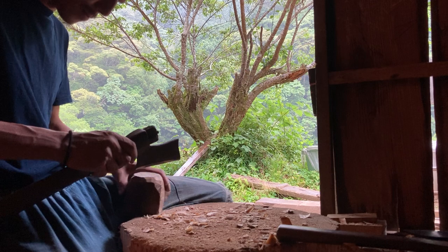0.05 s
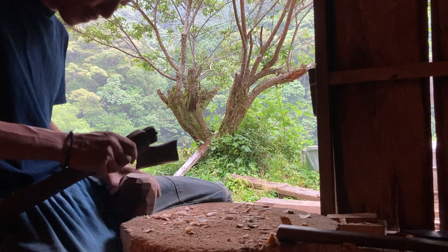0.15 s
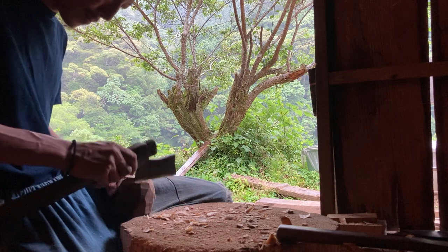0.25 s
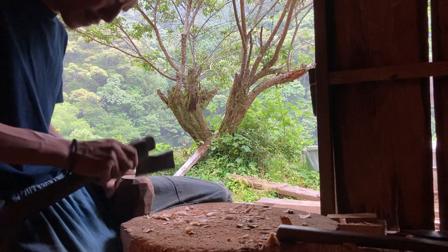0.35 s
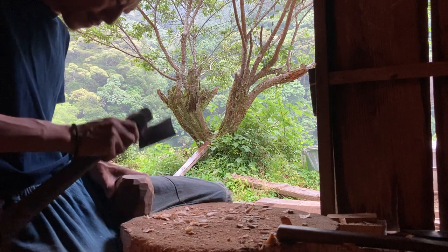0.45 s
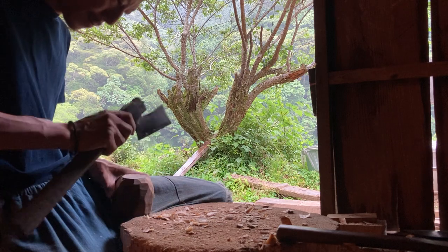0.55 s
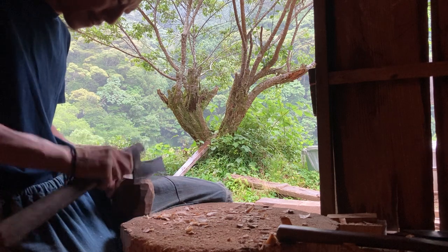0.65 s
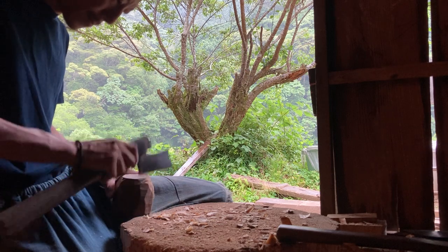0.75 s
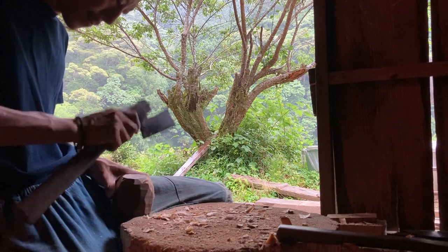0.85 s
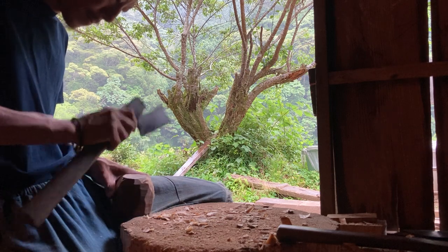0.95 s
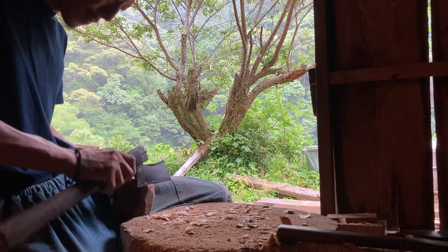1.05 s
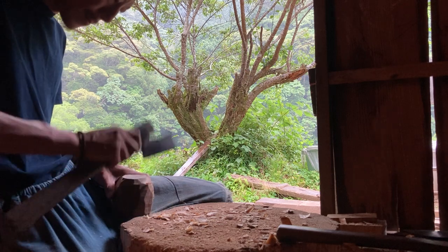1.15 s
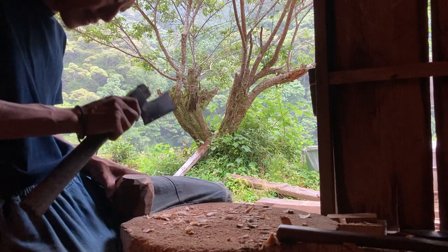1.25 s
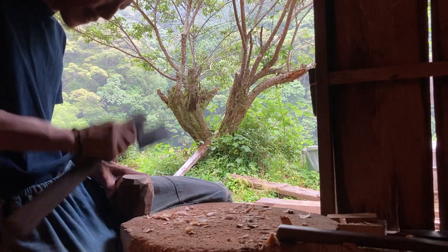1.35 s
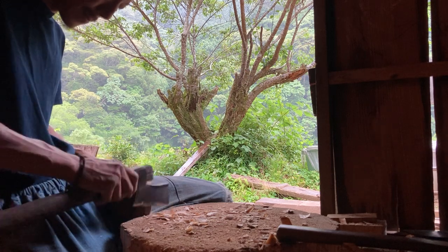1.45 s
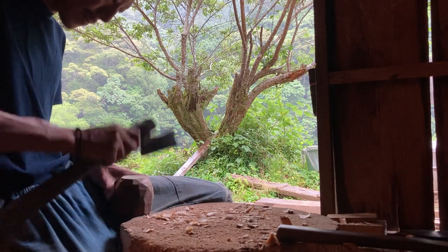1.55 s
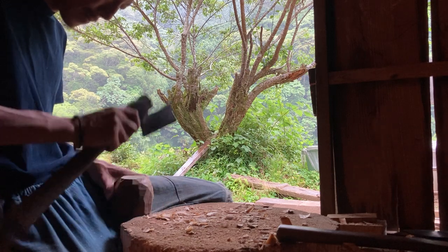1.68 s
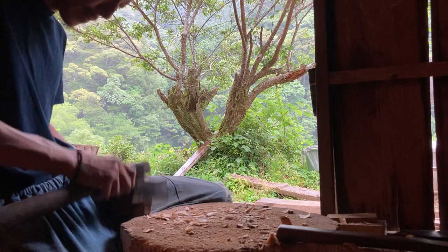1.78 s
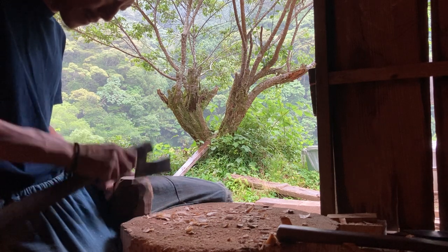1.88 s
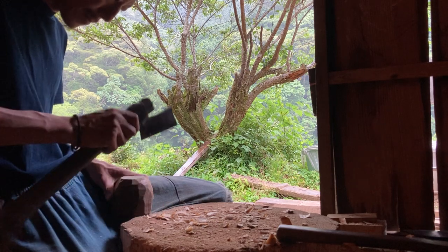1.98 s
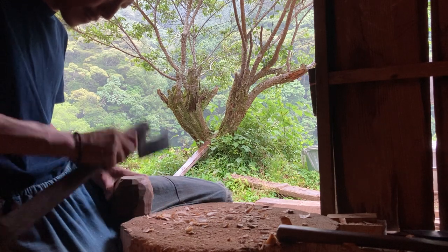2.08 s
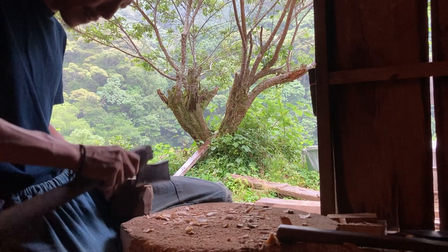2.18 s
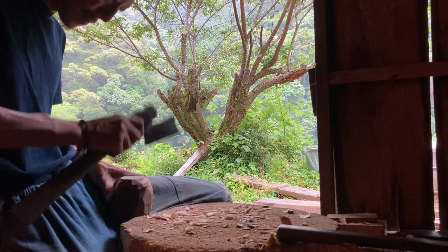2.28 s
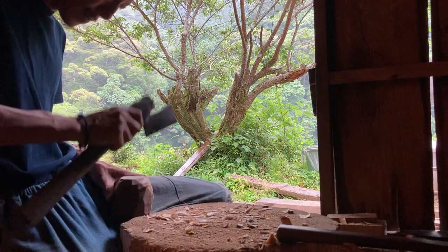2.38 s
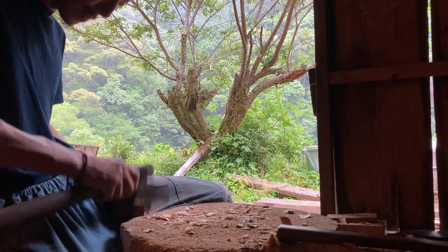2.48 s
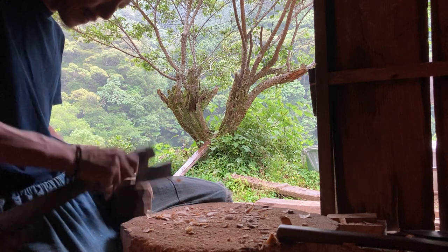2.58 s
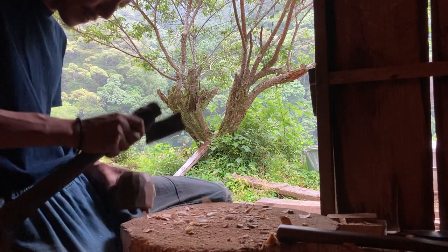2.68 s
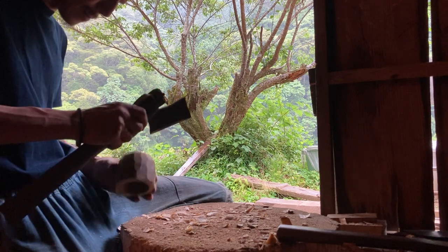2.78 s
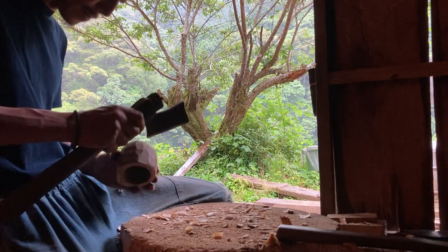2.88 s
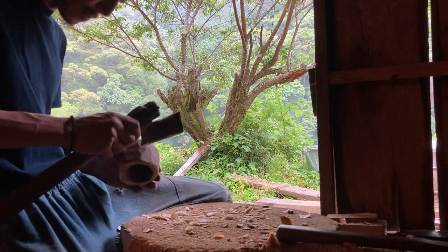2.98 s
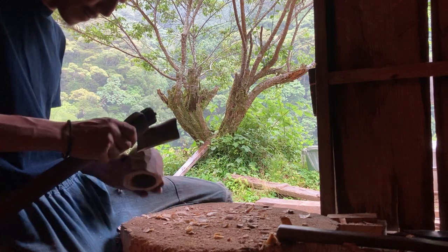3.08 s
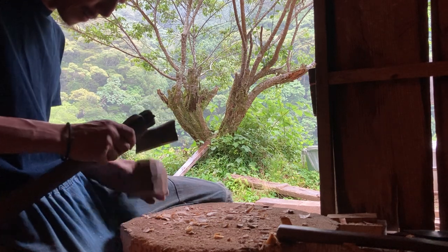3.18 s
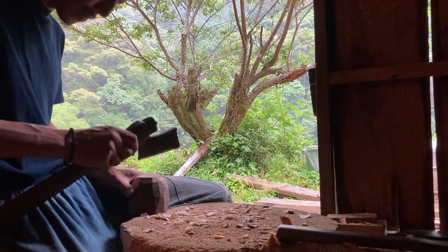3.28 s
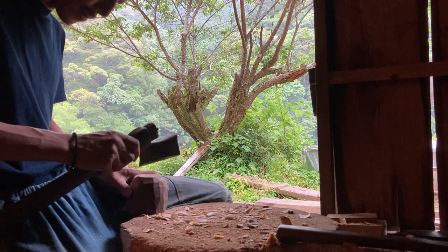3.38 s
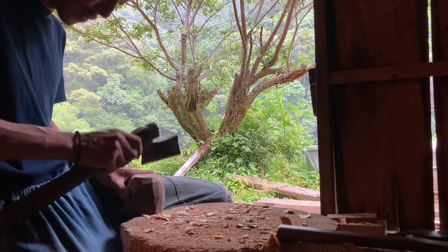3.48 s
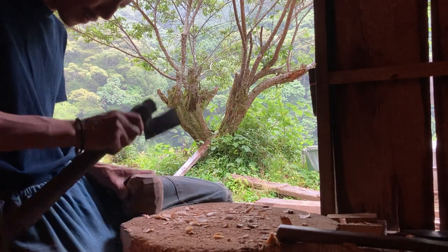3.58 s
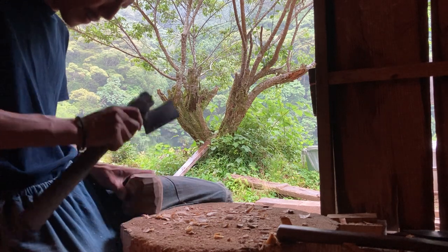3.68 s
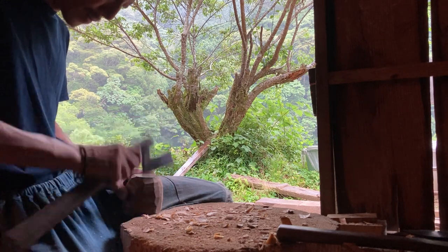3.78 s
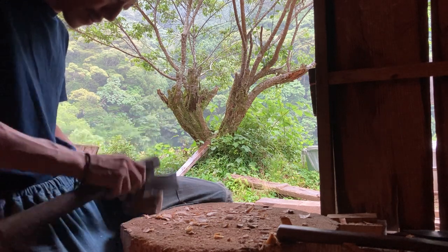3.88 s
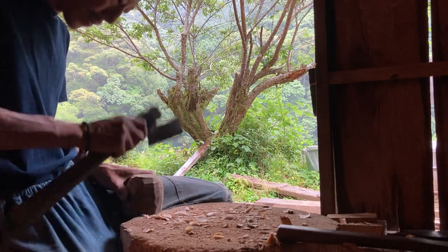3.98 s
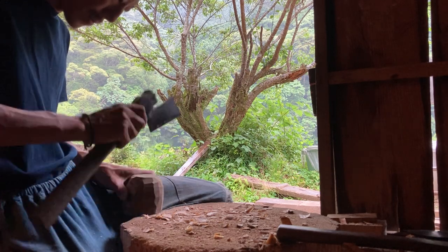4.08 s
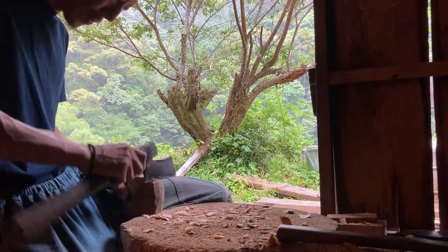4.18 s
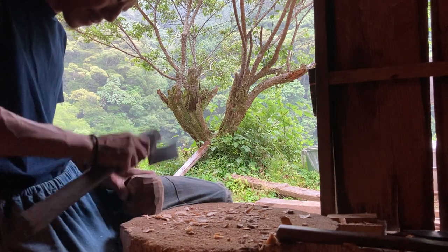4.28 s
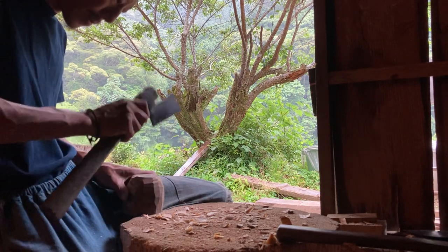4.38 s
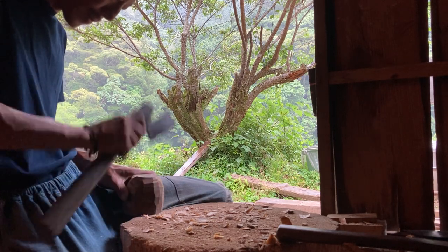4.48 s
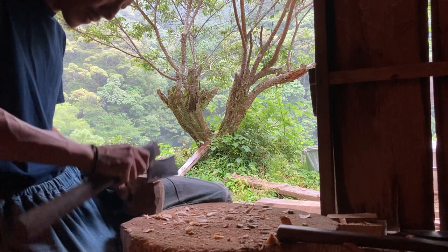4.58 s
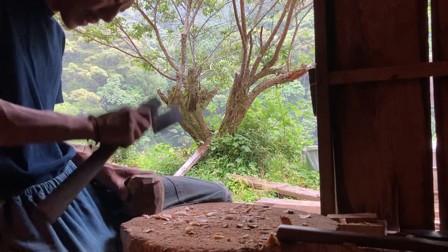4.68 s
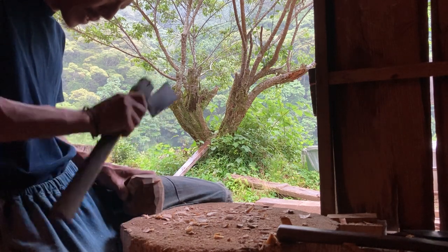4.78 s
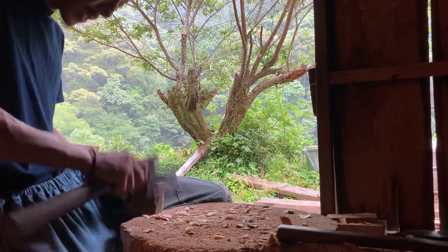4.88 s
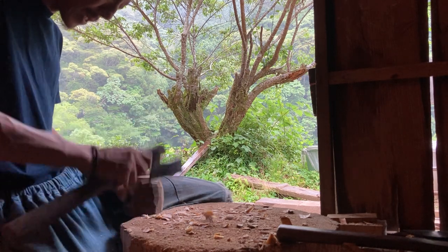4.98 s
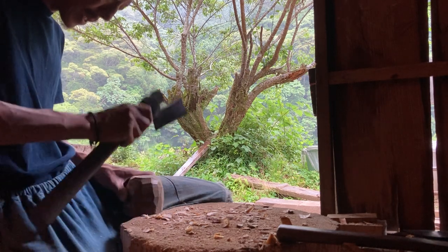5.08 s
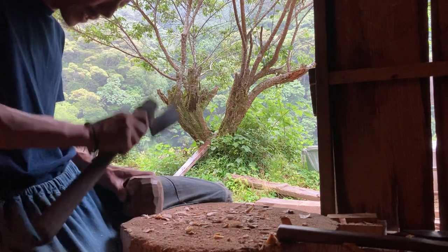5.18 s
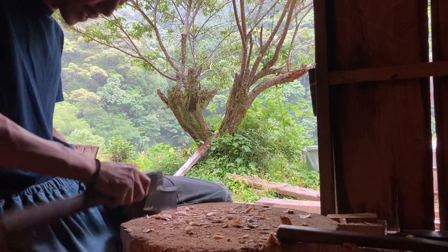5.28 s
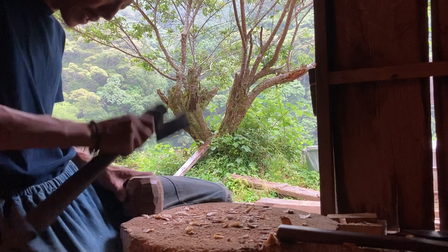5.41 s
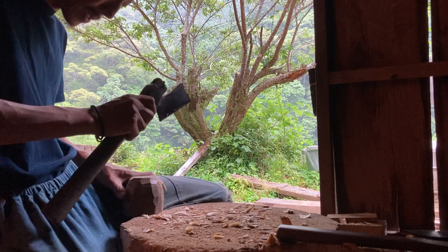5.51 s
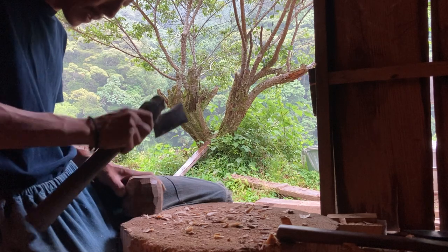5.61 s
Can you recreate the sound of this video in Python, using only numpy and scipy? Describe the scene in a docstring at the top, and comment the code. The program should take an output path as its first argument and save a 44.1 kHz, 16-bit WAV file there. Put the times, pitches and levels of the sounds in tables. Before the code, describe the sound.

Twelve short chops of a hatchet on a wooden blank resting on a heavy stump, about three a second, in two groups of six. The first group is bright and cracking; the second starts with a soft hollow knock and a weak chop, then turns strong and splintery. Small scrapes of chips and cloth fill the gaps. Close stereo pickup, small wooden shed with brief echoes, quiet outdoor air and low rumble.

```python
"""Hatchet work in a plank shed

Close to two microphone ports, in an open plank shed, a hatchet trims a wooden blank on a chopping stump.
Each chop is shaped noise for the splitting fibres and crushed wood, and dying sines for the knock and ring
of the blank, the clink of the steel and the thud of the stump. The shed answers with echoes, a tail and
resonances, a far wall with one faint slap. Filtered noise makes rustling chips and clothes and outdoor air."""
import sys
import numpy as np
from scipy import signal
from scipy.fft import rfft, irfft, next_fast_len
from scipy.io import wavfile
from scipy.ndimage import uniform_filter1d

SR = 44100
rng = np.random.default_rng(int(sys.argv[2]) if len(sys.argv) > 2 else 0)


def generate_wav(signal):
    """Clip the signal to [-1, 1] and save it as 16-bit WAV at the path in sys.argv[1]."""
    frames = np.transpose(np.atleast_2d(signal))
    scaled = np.clip(frames, -1, 1) * 32767
    pcm = np.round(scaled).astype(np.int16)
    wavfile.write(sys.argv[1], SR, pcm)


N = 249165
CHOP_SIZE = 16384  # samples given to one short sound


def amp(db):
    """Turns decibels into an amplitude factor."""
    return 10 ** (np.asarray(db) / 20)


def evened(x):
    """Scales to an rms of 1."""
    return x / np.sqrt(np.mean(x ** 2) + 1e-20)


def burst(x, db):
    """Scales a short sound to the energy of 10 ms at the given level."""
    return amp(db) * x * np.sqrt(SR / 100 / (np.sum(x ** 2) + 1e-20))


def read(points, hz, axis=1):
    """Reads one column of a table, joined by straight lines over log frequency."""
    table = np.transpose(points)
    return np.interp(np.log(hz + 1), np.log(table[0] + 1), table[axis])


def freqs(size):
    """Frequencies [Hz] of the bins of a real spectrum."""
    return np.fft.rfftfreq(size, 1 / SR)


def octave_band(hz, centre, octaves):
    """A bell-shaped pass band over log frequency; the width is its standard deviation."""
    return np.exp(-.5 * (np.log2((hz + 1) / centre) / octaves) ** 2)


def add(mix, s, sound):
    """Mixes a sound in at s seconds."""
    part = mix[max(round(s * SR), 0):][:len(sound)]
    part += sound[:len(part)]


def tilted(table, db_per_octave):
    """Makes a table of (frequency [Hz], level [dB], ..) brighter or duller."""
    return [(hz, db + db_per_octave * np.log2(hz / table[0][0]), *rest) for hz, db, *rest in table]


def colour(x, points):
    """Causal filter with the given spectrum."""
    log_gain = np.log(amp(read(points, abs(np.fft.fftfreq(1024, 1 / SR)))))
    # the Hilbert transform of the log gain gives the minimum phase
    taps = np.fft.ifft(np.exp(np.conj(signal.hilbert(log_gain)))).real
    return signal.fftconvolve(x, taps)[:len(x)]


def whiten(x):
    """Evens out the spectrum of a burst, so that it has no pitch of its own."""
    power = uniform_filter1d(abs(rfft(x)) ** 2, size=61)
    inverse_db = -10 * np.log10(power / power.mean() + 1e-6)
    return colour(x, np.column_stack([freqs(len(x)), inverse_db]))


def struck(modes, pitch, rise, scatter_db, detune):
    """Dying sines that build up while the blade pushes; each blow weights them a little differently."""
    t = np.arange(CHOP_SIZE) / SR
    chance = rng.standard_normal((len(modes), 2))
    sines = np.zeros(CHOP_SIZE)
    for (f, db, t60), (louder, sharper) in zip(modes, chance):
        envelope = amp(db + scatter_db * louder - 60 * t / t60)
        sines += envelope * np.sin(2 * np.pi * f * pitch * (1 + detune * sharper) * t)
    return sines * (1 - np.exp(-(t / rise) ** 2))


def scrape(db, hz, octaves, fade):
    """One soft grainy scrape: band-limited noise of uneven strength that starts fast and fades."""
    t = np.arange(CHOP_SIZE) / SR
    noise = rng.standard_normal(CHOP_SIZE)
    unevenness = evened(uniform_filter1d(rng.standard_normal(CHOP_SIZE), 120))
    grains = noise * amp(4.5 * unevenness)
    body = evened(irfft(rfft(grains) * octave_band(freqs(CHOP_SIZE), hz, octaves)))
    return amp(db) * body * (1 - np.exp(-t / 0.0014)) * np.exp(-t / fade)


# how alike diffuse sound is at the two ports: (frequency [Hz], left-right likeness [0 to 1])
PORT_LIKENESS = [(60, 0.9), (220, 0.82), (450, 0.76), (700, 0.074), (3000, 0.08), (12000, 0.023)]


def diffuse(pair):
    """Spectra of two unrelated noises, made alike in the bass as at two close ports."""
    left, other = rfft(pair)
    same = np.clip(read(PORT_LIKENESS, freqs(pair.shape[1])), 0, 1)
    return np.array([left, same * left + np.sqrt(1 - same ** 2) * other])


def stir(x, patchy_db):
    """Lets a noise swell and sink in patches, about 600 Hz wide and a tenth of a second long."""
    z = signal.stft(x, nperseg=512)[2]
    smooth_pitch = uniform_filter1d(rng.standard_normal(z.shape[1:]), size=7, axis=0)
    patches = evened(uniform_filter1d(smooth_pitch, size=18, axis=1))
    return signal.istft(z * amp(patchy_db * patches), nperseg=512)[1][:, :N]


# the rumble at rest [dB], just after a blow relative to the thud [dB], and its dying time [s]
RUMBLE_REST_DB, RUMBLE_CHOP_DB, RUMBLE_T60_S = -66, -35, 6.2


def rumble_level(t):
    """The rumble swells after each thud of the stump and sinks back slowly."""
    thuds = [(s, db) for s, *_, db, _ in CHOPS] + BLANK_BUMPS
    swells = [(t > s) * amp(db + RUMBLE_CHOP_DB - 60 * abs(t - s) / RUMBLE_T60_S) for s, db in thuds]
    return np.sqrt(amp(RUMBLE_REST_DB) ** 2 + np.sum(np.square(swells), axis=0))


AIR_DB = -57
# spectral shape of the outdoor hiss: (frequency [Hz], relative level [dB per Hz])
AIR_SPECTRUM = [(15, -39), (25, -19), (59, -2.5), (149, -10), (285, -6), (394, -16), (439, -7.5),
                (775, -13), (2800, -18.5), (10700, -30), (16000, -41)]


def air():
    """Faint hiss of leaves on the hillside and a low rumble that swells and sinks."""
    hz, t = freqs(N), np.arange(N) / SR
    leaves = irfft(diffuse(rng.standard_normal((2, N))) * amp(read(AIR_SPECTRUM, hz)), N)
    hiss = evened(stir(leaves, patchy_db=1.1))
    low = octave_band(hz, 58, 0.5)
    rumble = evened(irfft(diffuse(rng.standard_normal((2, N))) * low, N))
    return amp(AIR_DB) * hiss + rumble_level(t) * rumble


# a wall across the yard sends back the middle of each knock: delay, level, centre and width
FAR_ECHO_S, FAR_ECHO_DB, FAR_ECHO_HZ, FAR_ECHO_OCTAVES = .11, -26.5, 1680, 0.066


def far_echo(x):
    """One late, thin slap from outside the shed."""
    size = next_fast_len(N + SR // 4, True)
    hz = freqs(size)
    band = octave_band(hz, FAR_ECHO_HZ, FAR_ECHO_OCTAVES)
    delay = np.exp(-2j * np.pi * hz * FAR_ECHO_S)
    return amp(FAR_ECHO_DB) * irfft(rfft(x, size) * band * delay, size)[:N]


# the shed's diffuse tail: (frequency [Hz], level [dB], t60 [s])
DIFFUSE_TAIL = [(88.5, -6, 0.49), (194, -5.5, 0.33), (450, -1, 0.22), (1400, -5, 0.2), (2850, -4.5, 0.2),
                (7140, -16.5, 0.2), (14400, -35, 0.32)]
# echoes off stump top, posts and walls: (left port delay [s], right port delay [s], relative level [dB])
NEAR_ECHOES = [(.0021, .0023, -18), (.0048, 0.0052, -7.5), (.0088, 0.0099, -18), (.0205, .0207, -18.5),
               (.0325, 0.0335, -32)]
# lingering resonances of the shed: (frequency [Hz], relative gain at the peak [dB], t60 [s])
SHED_RESONANCES = [(334, 0, 0.19), (580, -20, 0.11), (850, -3, 0.06), (1178, -17.5, 0.1), (1320, -4, 0.31),
                   (1467, 2, 0.13), (1630, -10, 0.49)]


def shed(x, build_up, echo_db, modes_db):
    """A few echoes, a random diffuse tail that dies band by band, and lingering resonances."""
    size = SR // 2
    t, hz = np.arange(size) / SR, freqs(size)
    noise, response = diffuse(rng.standard_normal((2, size))), np.zeros((2, size))
    for k, (_, db, t60) in enumerate(DIFFUSE_TAIL):
        # each band is full at its own row and gone at its neighbours
        band = read([(row[0], float(j == k)) for j, row in enumerate(DIFFUSE_TAIL)], hz)
        fade = amp(-60 * t / t60) * (1 - np.exp(-t / build_up))
        response += amp(db) * irfft(noise * band, size) * fade / np.linalg.norm(fade)
    # narrow posts and planks throw back little bass
    bounce = signal.lfilter(*signal.butter(1, 700, "highpass", fs=SR), signal.unit_impulse(CHOP_SIZE))
    for k, (*delays, db) in enumerate(NEAR_ECHOES):
        for channel, delay in zip(response, delays):
            add(channel, delay, (-1) ** k * amp(db + echo_db) * bounce)
    for f, db, t60 in SHED_RESONANCES:
        peak_gain = 2 * np.log(1000) / (t60 * SR)
        phases = rng.uniform(0, 2 * np.pi) + rng.standard_normal((2, 1)) * f / 1300
        response += amp(db + modes_db - 60 * t / t60) * peak_gain * np.sin(2 * np.pi * f * t + phases)
    return signal.fftconvolve(x[None], response, axes=1)[:, :N]


# clothes stir faintly as the arm works: level, centre, width and fade of one stir, then their spreads
CLOTH_DB, CLOTH_HZ, CLOTH_OCTAVES, CLOTH_FADE_S = -66.5, 3130, 1, 0.14
CLOTH_SPREAD_DB, CLOTH_SPREAD_OCTAVES = 2.5, 1.2
RUSTLE_FADE_S = 0.038
# the clearest scrapes of chips and grip: (time [s], level [dB], centre [Hz], width [octaves])
CLEAR_RUSTLES = [(.035, -63, 450, 0.11), (.11, -58.5, 2820, 1), (.145, -68, 1450, 0.08),
                 (.26, -66, 9800, 0.19), (.29, -60, 444, 0.22), (.3, -59, 2510, 0.94),
                 (.355, -60.5, 473, 0.12), (.515, -57.5, 2720, .15), (.8, -57.5, 9800, 0.93),
                 (.89, -55.5, 368, 0.67), (1.675, -66, 4100, 0.16), (1.72, -62.5, 9160, 0.28),
                 (1.974, -55.5, 7250, 0.12), (2.48, -57.5, 2100, 0.25), (2.71, -58.5, 566, 0.35),
                 (2.835, -54.5, 1850, 0.14), (2.875, -68, 1640, 0.14), (3.02, -66, 4400, 0.14),
                 (3.2, -60.5, 7400, 0.69), (3.55, -79, 450, 0.41), (4.08, -62.5, 3500, 0.14)]


def rustles(count):
    """A few clear scrapes of chips and hands, and faint stirs of cloth strewn all through."""
    out = np.zeros(N)
    for s, db, hz, octaves in CLEAR_RUSTLES:
        add(out, s, scrape(db, hz, octaves, RUSTLE_FADE_S))
    for k, (when, strength, height) in enumerate(rng.uniform(-1, 1, (count, 3))):
        s = (k + .5 + .5 * when) / count * N / SR
        hz = CLOTH_HZ * 2 ** (CLOTH_SPREAD_OCTAVES * height)
        add(out, s, scrape(CLOTH_DB + CLOTH_SPREAD_DB * strength, hz, CLOTH_OCTAVES, CLOTH_FADE_S))
    return out


# the whole stump on the floor: (frequency [Hz], relative level [dB], t60 [s])
STUMP_MODES = [(59.8, -10, 0.11), (101.3, -4.5, 0.11), (116.5, -8, 0.12), (133.6, -10.5, 0.058),
               (169.4, 3.5, 0.046), (206.6, 4, 0.05), (257, 3, 0.029)]


def thud(db, brightness=0):
    """The blank drives the heavy stump against the floor, which radiates little deep bass."""
    ringing = struck(tilted(STUMP_MODES, brightness), 1, rise=.006, scatter_db=1, detune=.015)
    return burst(signal.lfilter(*signal.butter(2, 55, "highpass", fs=SR), ringing), db)


# the top of the stump: (frequency [Hz], relative level [dB], t60 [s])
STUMP_TOP_MODES = [(286, -3, 0.033), (331.2, -20.5, 0.19), (406.5, 0, 0.06), (454.7, -3, 0.052),
                   (523.5, -1, 0.049), (612, -9.5, 0.07), (993, 2, 0.012), (1070, 3, 0.015)]


def clonk(db):
    """The top of the stump rings, building up a little more slowly than the blank."""
    return burst(struck(STUMP_TOP_MODES, 1, rise=.002, scatter_db=1.5, detune=.012), db)


# the hatchet head: (frequency [Hz], relative level [dB], t60 [s])
STEEL_MODES = [(2773, 4, 0.012), (2794, -4.5, 0.018), (4010, -5, 0.02), (4705, -4.5, 0.013),
               (5470, -4.5, 0.012), (12600, -26.5, 0.09), (15200, -25.5, 0.087)]
# the twisting modes of the head: (frequency [Hz], relative level [dB], t60 [s])
TWIST_MODES = [(3020, 4.5, 0.0061), (3276, -2.5, 0.014)]


def clink(modes, db):
    """The steel head rings only briefly while it is wedged in the wood."""
    return burst(struck(modes, 1, rise=.0005, scatter_db=1.5, detune=.005), db)


# the blank's hollow modes: (multiple of the knock pitch [ratio], relative level [dB], t60 [s])
KNOCK_MODES = [(.88, -11.5, 0.031), (1, 3, 0.022), (1.12, -4, 0.017), (1.47, -21.5, 0.053),
               (1.7, -29.5, 0.035), (2.7, -28, 0.083)]


def knock(db, hz):
    """The hollow low modes of the blank."""
    return burst(struck(KNOCK_MODES, hz, rise=.0013, scatter_db=1, detune=.008), db)


# the lower partner of the ring: its pitch, level and decay time relative to the ring's
RING_PAIR_RATIO, RING_PAIR_DB, RING_PAIR_LIFE = 0.877, -1, 0.57


def ring(db, hz, t60):
    """Two close modes of the blank swing against each other: a woody ring that the wedged blade damps."""
    upper_mode = [(1, 0, t60)]
    lower_mode = [(RING_PAIR_RATIO, RING_PAIR_DB, t60 * RING_PAIR_LIFE)]
    upper = struck(upper_mode, hz, rise=.0008, scatter_db=.5, detune=.003)
    lower = struck(lower_mode, hz, rise=.0008, scatter_db=.5, detune=.003)
    return burst(lower - upper, db)


OVERTONE_T60_S = 0.02


def overtone(db, hz):
    """A higher bending mode of the blank, which shifts with the grip."""
    return burst(struck([(1, 0, OVERTONE_T60_S)], hz, rise=.0006, scatter_db=0, detune=.003), db)


# level relative to the ring's setting, centre, width and fade
CRUNCH_DB, CRUNCH_HZ, CRUNCH_OCTAVES, CRUNCH_FADE_S = -9, 950, 0.75, 0.0099


def crunch(ring_db):
    """Wood crushed under the blade gives a short grainy noise that follows the level of the ring."""
    return scrape(ring_db + CRUNCH_DB, CRUNCH_HZ, CRUNCH_OCTAVES, CRUNCH_FADE_S)


SPLIT_RISE_S, SPLIT_S = .00065, 0.0024  # the edge enters and bites in
PEEL_DB, PEEL_S, SNAP_SPREAD_DB = -26.5, 0.036, 5  # the chip peels off; how much the snaps differ in size
# spectrum of splitting fibres before any tilt: (frequency [Hz], relative level [dB per Hz])
FIBRE_SPECTRUM = [(200, -10.5), (600, 1.5), (1400, 1), (2000, 2), (3000, -3), (5200, -5.5), (6200, -10.5),
                  (7300, -6), (9000, -15.5), (11500, -12), (13500, -21), (15300, -14), (17000, -33.5)]


def split(db, brightness):
    """Fibres snap in a dense, dry burst as the edge enters, then thinly as the chip peels off."""
    t = np.arange(CHOP_SIZE) / SR
    noise = rng.standard_normal(CHOP_SIZE)
    snap_size = np.repeat(rng.standard_normal(CHOP_SIZE // 16), 16)
    snaps = noise * amp(SNAP_SPREAD_DB * snap_size)
    shape = (1 - np.exp(-t / SPLIT_RISE_S)) * (np.exp(-t / SPLIT_S) + amp(PEEL_DB) * np.exp(-t / PEEL_S))
    return burst(colour(whiten(snaps * shape), tilted(FIBRE_SPECTRUM, brightness)), db)


EXTRA_CRACK_DB_PER_OCTAVE, SPLINTER_DB_PER_OCTAVE = -1.5, -0.5  # brightness
THUD_DELAY_S = 0.004706  # the stump moves this long after the blank
# the blank drops back or settles on the stump: (time [s], level [dB])
BLANK_BUMPS = [(0.875, -49), (4.86, -52), (5.127, -43.5), (5.363, -24.5), (5.599, -58)]
# splinters snap as a chip tears away: (time [s], level [dB])
SPLINTER_SNAPS = [(2.572, -35), (4.997, -52), (5.012, -46)]
# further crackling bursts within milliseconds of the start of some chops: (time [s], level [dB])
EXTRA_CRACKS = [(1.1192, -31), (4.271, -34.5), (4.6123, -38), (4.617, -38), (4.6229, -26), (4.9687, -30),
                (5.3325, -32.5)]
# one row a chop: (time [s], ring pitch of the blank [Hz], ring t60 [s], knock pitch [Hz], knock level [dB],
# ring level [dB], overtone pitch [Hz], overtone level [dB], steel level [dB], blade twist level [dB],
# fibre crack level [dB], crack brightness [dB per octave], stump top level [dB],
# stump thud level [dB], thud brightness [dB per octave])
CHOPS = [(0.7396, 1393, 0.015, 663, -33, -28, 2220, -40, -43, -43, -31, -1.5, -31.5, -25, -1),
         (1.1173, 1416, 0.022, 736, -26, -20, 2184, -29, -34, -34, -31.5, 0, -23.5, -24.5, 5),
         (1.4772, 1490, 0.011, 744, -25.5, -19.5, 2225, -28.5, -25.5, -28, -26.5, 0, -28, -25.5, -1),
         (1.8509, 1320, 0.0091, 674, -40.5, -23, 2258, -28.5, -32.5, -40, -24.5, -1.14, -32.5, -30, -1),
         (2.2043, 1445, 0.014, 710, -29.5, -22.5, 2240, -32, -30, -38, -27.5, -1.5, -33.5, -27, 3),
         (2.5475, 1515, 0.0089, 700, -37, -25, 2190, -32, -26, -22.5, -21, -0.2, -31, -29, -3.5),
         (3.337, 1400, 0.013, 748, -19, -36, 2050, -36, -61, -58, -37.5, -3.5, -21, -26.5, 2),
         (3.884, 1220, 0.0086, 828, -35.5, -29.5, 2120, -55, -44, -42, -33.5, 1, -29.5, -30.5, 0),
         (4.2674, 1637, 0.0092, 736, -23.5, -22, 2230, -50, -46, -37, -29.5, 0, -24.5, -20.5, 2),
         (4.6198, 1693, 0.022, 768, -17, -20.5, 2330, -46, -28.5, -26.5, -21.5, -2, -23, -21.5, 5.5),
         (4.966, 1700, 0.01, 825, -21, -20, 2100, -26.5, -37, -28.5, -20.5, -1.2, -22.5, -21.5, 1.5),
         (5.3315, 1420, 0.0094, 772, -24.5, -28.5, 2234, -25, -25, -26.5, -22.5, -1.6, -25.5, -42, 13)]


def hatchet(count):
    """Every chop sets blank, steel and stump ringing; the chops are dealt in turn into groups."""
    groups = np.zeros((count, N))
    for k, (s, ring_hz, ring_t60, knock_hz, knock_db, ring_db, overtone_hz, overtone_db, steel_db, twist_db,
            crack_db, crack_tilt, top_db, thud_db, thud_tilt) in enumerate(CHOPS):
        # the chops take turns among several random draws of the shed's tail
        out = groups[k % count]
        add(out, s, knock(knock_db, knock_hz))
        add(out, s, ring(ring_db, ring_hz, ring_t60))
        add(out, s, overtone(overtone_db, overtone_hz))
        add(out, s, clink(STEEL_MODES, steel_db) - clink(TWIST_MODES, twist_db))
        add(out, s, split(crack_db, crack_tilt))
        add(out, s, crunch(ring_db))
        add(out, s, clonk(top_db))
        add(out, s + THUD_DELAY_S, thud(thud_db, thud_tilt))
    for s, db in EXTRA_CRACKS:
        add(groups[0], s, split(db, EXTRA_CRACK_DB_PER_OCTAVE))
    for s, db in SPLINTER_SNAPS:
        add(groups[0], s, split(db, SPLINTER_DB_PER_OCTAVE))
    for s, db in BLANK_BUMPS:
        add(groups[0], s, thud(db))
    return groups


# direct sound at the two microphone ports:
# (frequency [Hz], left minus right level [dB], phase lead of the left port [rad])
PORT_BALANCE = [(105, -3, 0.32), (416, -1.5, 0.55), (870, 3.5, 2.02), (980, 7, 0.54), (1530, 8.5, 0.4),
                (2225, -1, 4.5), (3190, 3, 3.5), (4400, 1.5, 5), (5600, -3, 4), (6300, 1.5, 0.5),
                (8640, -0.5, -2.9), (10800, -0.5, -7.5), (11600, 1, -4.5), (15800, -1, -11.5)]


def ports(x):
    """The direct sound reaches the two ports with a level and phase of their own."""
    size = next_fast_len(N + 512, True)
    hz, z = freqs(size), rfft(x, size)
    balance = amp(read(PORT_BALANCE, hz, axis=1))
    lag = np.exp(-1j * read(PORT_BALANCE, hz, axis=2))
    constant_power = np.sqrt(2 / (1 + balance ** 2))
    return irfft(np.array([balance * z, lag * z]) * constant_power, size)[:, :N]


def scene():
    """Chops and rustles heard directly and through the shed, over the outdoor air."""
    sources = [*hatchet(count=4), rustles(count=16)]
    direct = sum(sources)
    # each group of chops, and the rustles, gets its own random draw of the same shed's tail
    answer = sum(shed(x, build_up=0.0011, echo_db=-4.5, modes_db=1.5) for x in sources)
    return amp(2) * ports(direct) + answer + far_echo(direct) + air()


EDGE_HZ = 16500  # upper band limit


def record(dry):
    """The microphone sheds the deepest bass and rounds off the loudest peaks; then the band limit."""
    lean = signal.sosfilt(signal.butter(2, 48, "highpass", fs=SR, output="sos"), dry)
    held = lean / (1 + abs(lean / .95) ** 6) ** (1 / 6)
    low_pass = signal.firwin(511, EDGE_HZ, window=("kaiser", 9), fs=SR)
    return signal.oaconvolve(held, low_pass[None], "same")


dry = scene()
out = record(dry)
generate_wav(out)
```